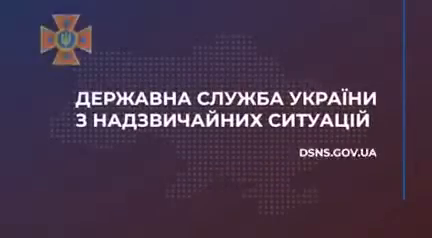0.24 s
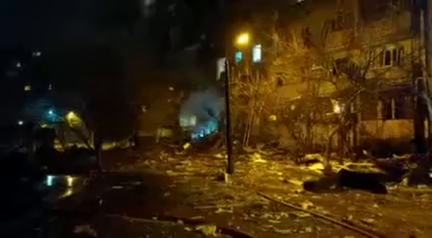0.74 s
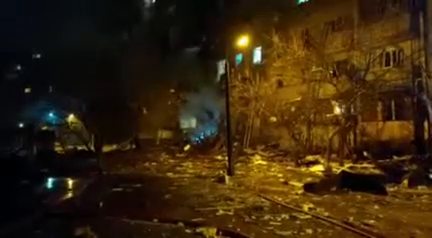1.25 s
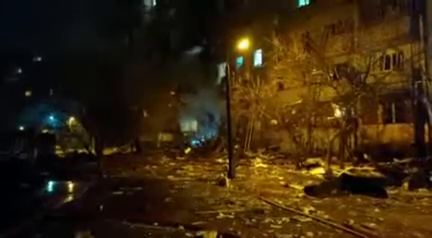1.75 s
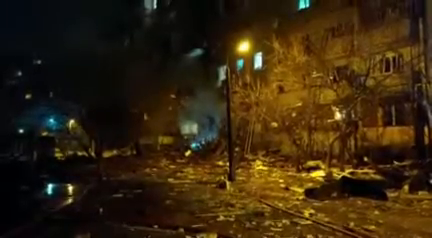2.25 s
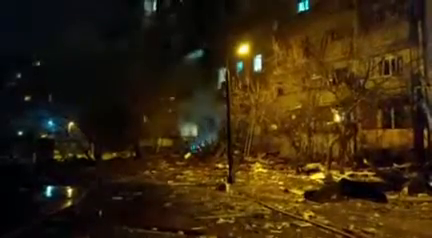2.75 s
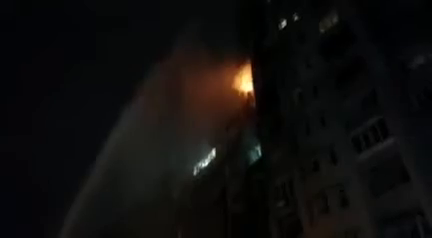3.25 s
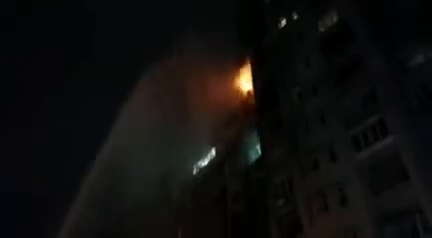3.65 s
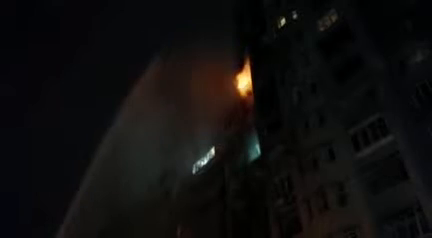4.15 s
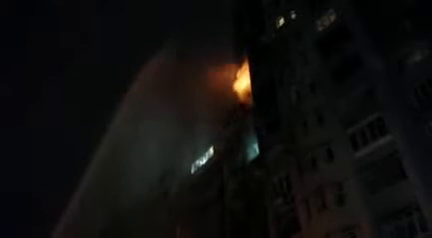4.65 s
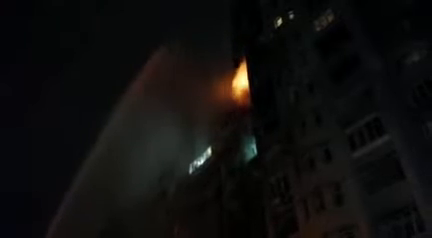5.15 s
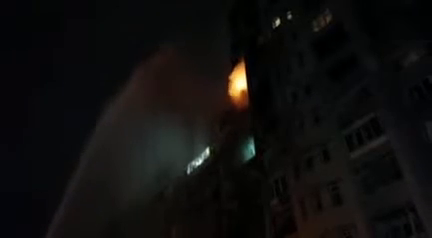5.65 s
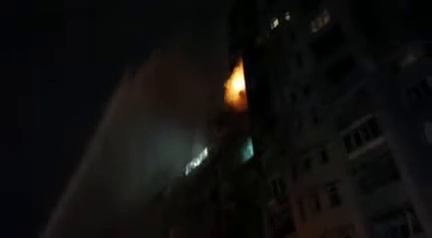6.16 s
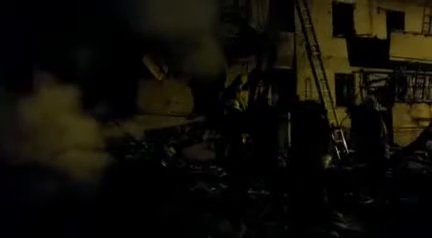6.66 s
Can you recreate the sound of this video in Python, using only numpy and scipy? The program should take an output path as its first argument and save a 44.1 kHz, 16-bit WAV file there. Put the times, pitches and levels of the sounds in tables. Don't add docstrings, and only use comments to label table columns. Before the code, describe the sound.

After half a second of silence, a fire engine's diesel drones steadily under a high whining pump; late on, revs lift slightly and a thin whistle appears.

```python
import sys
import numpy as np
from scipy import signal
from scipy.fft import irfft
from scipy.io import wavfile
from scipy.ndimage import uniform_filter1d

SR = 44100
rng = np.random.default_rng(int(sys.argv[2]) if len(sys.argv) > 2 else 0)


def wav_record(signal):
    frames = np.transpose(np.atleast_2d(signal))
    bounded = np.clip(frames, -1, 1)
    quanta = np.round(bounded * 32767).astype(np.int16)
    wavfile.write(sys.argv[1], SR, quanta)


def gain_from_db(level_db):
    decades = np.asarray(level_db, float) / 20
    return 10 ** decades


N = 305172
T = np.arange(N) / SR
LAG, START = 109409, 21992
STEADY_TURNS = 22.52

# time in seconds, tooth load in dB, wobble of the drive wheels in dB,
# wobble of the pump shaft in dB.
PUMP_DRIVE = [(2.98, 0.2, -2, 5), (3.6, -0.5, 0, 1.5), (4.1, 0.5, 0.5, -2), (4.3, 0.1, 1.5, 1),
              (4.7, 0.1, 0.5, 4), (4.9, 0.5, -12, -4), (5.1, 0.2, 9, 5), (5.55, 0.1, -1, 2),
              (5.75, -2.5, 2, 1), (5.9, -7.5, 0.5, 6), (6.05, -11, 2, 3), (6.2, -9, -1, -1),
              (6.3, -11, -12, 3), (6.48, -10.5, -13, 10.5), (6.65, -11, -19, 1), (6.92, -6.5, -7, 6.5)]
# time in seconds, crank turns a second.
ENGINE_SPEED = [(2.98, 22.509), (3.8, 22.538), (4.3, 22.506), (4.8, 22.523), (5.5, 22.502), (5.6, 22.532),
                (5.7, 22.601), (5.8, 22.676), (6.0, 22.717), (6.1, 22.718), (6.2, 22.796), (6.3, 22.926),
                (6.4, 22.984), (6.5, 23.206), (6.6, 23.325), (6.8, 23.4), (6.92, 23.378)]
# multiple of crank speed, level in dB rms, left minus right in dB,
# left lead in radians. The next three tables have the same columns.
CRANK_TONES = [(3.0, -28.5, -1.2, 0.1), (4.5, -39.6, 0.1, 0.4), (5.0, -30.9, 0.3, 0.5),
               (6.0, -29.4, 2.2, 0.0), (6.5, -47.5, -1.3, 0.0), (7.5, -39.0, -1.1, 0.0),
               (8.0, -46.7, -3.6, -0.3), (10.0, -44.1, -3.8, 0.4), (11.5, -46.3, -1.5, 0.3),
               (12.5, -41.5, 2.8, 0.2), (13.0, -34.5, 0.1, -0.1), (14.0, -36.9, -0.0, -0.1),
               (14.5, -43.5, -0.9, -0.2), (15.0, -44.2, 0.0, 0.0), (16.0, -47.3, 1.0, 0.4),
               (16.5, -43.6, -1.0, 0.6), (17.0, -44.3, 0.2, 0.2), (17.5, -48.7, 3.3, 0.3),
               (18.0, -47.4, 0.4, 0.8), (19.5, -47.2, 3.4, 0.3), (25.5, -49.5, -1.0, 0.0),
               (28.5, -44.6, 2.1, 1.0), (30.0, -50.5, 2.7, 0.4), (31.0, -50.5, -0.4, 0.4),
               (32.0, -49.2, -2.7, 0.1)]
PUMP_SHAFT_TONES = [(4.2, -29.1, -0.5, 0.3), (8.4, -40.5, -1.7, -0.3), (10.5, -46.6, -1.2, 0.1),
                    (31.5, -45.1, 0.8, -0.0), (37.8, -43.0, 2.6, 0.3), (39.9, -36.0, -9.6, 2.0),
                    (44.1, -41.2, -7.3, 0.1), (46.2, -47.1, -4.4, -2.7), (52.5, -47.9, -6.1, 1.9),
                    (67.2, -48.6, 3.6, 1.2), (71.4, -46.4, 2.2, -1.3), (75.6, -39.2, -4.1, 0.1),
                    (81.9, -48.1, -2.5, 1.0), (84.0, -32.0, -14.6, 2.3), (86.1, -45.5, -1.0, -0.1),
                    (88.2, -41.2, -1.3, 0.2), (90.3, -47.7, -5.0, 0.2), (105.0, -55.0, -4.3, -1.1),
                    (117.6, -51.6, -3.3, 1.8), (126.0, -48.2, -11.8, 1.0)]
GEAR_TONES = [(39.07, -44.9, -3.8, -2.9), (49.0, -35.3, 1.4, 0.8), (55.5, -45.9, -5.6, 2.5),
              (58.5, -49.2, -2.7, 2.8), (64.0, -48.4, -0.7, 0.3), (64.5, -48.3, -4.7, 2.0),
              (74.6, -49.0, 0.0, -0.9), (76.59, -43.9, -8.4, 1.8), (83.03, -46.5, 7.0, 2.2),
              (85.0, -41.0, -5.5, 2.3), (97.0, -49.5, -4.1, -2.8), (98.0, -40.0, -1.1, 0.0),
              (98.99, -48.7, -8.2, 0.5), (124.0, -50.5, 8.7, 0.4), (125.0, -50.9, 0.2, -2.7),
              (127.0, -47.4, 7.1, 1.0), (146.0, -57.9, 5.7, -1.8), (147.0, -47.7, 5.3, -0.0),
              (148.0, -57.8, -6.5, 0.4), (196.0, -48.8, 11.6, -0.3), (223.03, -57.9, 6.9, -1.1),
              (245.0, -57.5, -1.7, -2.5), (294.0, -60.3, 1.1, 2.7)]
FAN_TONES = [(2.39, -38.9, -1.4, 0.0), (9.56, -31.4, -1.4, 0.0), (19.12, -44.5, -0.5, 0.2),
             (130.2, -53.5, 1.6, 1.6), (148.69, -56.1, -15.8, -0.2), (167.27, -56.5, 3.6, 0.6),
             (179.67, -53.5, 1.5, 2.9), (241.62, -59.5, -1.0, -0.9), (345.17, -62.6, 0.6, 2.2)]
# teeth a crank turn, left level in dB, right level in dB, left lead in radians.
DRIVE_MESH = (42, -20.6, -19.3, -.4)
# offset in crank turns, left level in dB,
# right level in dB, left angle to the mesh in radians, right angle in radians.
WHEEL_RUNOUT = [
    (-1, -33.8, -33, .8, .1),
    (-.9794, -30.5, -29.8, 1.8, 1.1),
    (1, -39.7, -33.7, 1.3, -.3),
    (.9794, -48.5, -36.1, 2.9, 1),
]
LEADING_TONES = [
    [5, 6, 7.5, 14],
    [37.8, 39.9, 44.1, 84, 126],
    [49, 147, 196, 75.6, 98, 88.2],
    [4.2, 8.4, 9.56],
]
# time in seconds, pitch in Hz, level in dB.
WHISTLE_PATH = [
    (6.25, 4680, -52),
    (6.278, 4648, -48),
    (6.382, 4650, -45),
    (6.402, 4639, -46),
    (6.674, 4620, -37.5),
    (6.79, 4656, -57),
    (6.92, 4644, -43),
]
# frequency in Hz, density in dB per Hz.
ROAR_COLOUR = [(25, -48.5), (40, -13), (60, -7), (118, -8.5), (175, -12), (300, -12), (518, -16.5),
               (710, -17), (950, -12), (1320, -15.5), (1940, -18.5), (2600, -24), (3380, -65)]
# frequency in Hz, density in dB per Hz.
HISS_COLOUR = [(1060, -49), (1800, -7.5), (1930, -7.5), (2270, -12.5), (2390, -12.5), (2870, -9.5),
               (3120, -17), (3230, -14), (4150, -15.5), (4530, -19), (6120, -24), (7860, -24.5),
               (10400, -27.5), (13100, -27.5), (14100, -32)]
# frequency in Hz, width in Hz, level in dB.
CASING_PANELS = [(900, 200, -44), (1950, 300, -40), (291, 92, -38.5), (2960, 230, -53), (4470, 99, -46),
                 (7800, 200, -52.5), (13500, 300, -56), (3680, 150, -48), (4760, 150, -49),
                 (5570, 150, -54), (6650, 170, -56), (8350, 200, -56), (11400, 500, -55)]
THROB_ORDERS = [1, 2, 3, 4, 4.2, 7, 21]
THROB_SHARES = [.11, .08, .07, .06, .05, .03, .06]
# frequency in Hz, share in common from 0 to 1.
PORT_LIKENESS = [(60, 0.98), (130, 0.87), (280, 0.9), (610, 0.71), (1330, 0.28), (2900, 0.28), (6290, 0.01),
                 (13700, 0.02)]
# frequency in Hz, phase in radians.
PORT_LEAD = [(0, -3.5), (1890, 1.5), (3270, 1), (6630, 19.5), (7750, 31), (10400, -19), (11600, -23),
             (13900, -12.5)]
# frequency in Hz, left minus right in dB.
PORT_BALANCE = [(60, 3), (130, -3.5), (610, 1.3), (1330, -1.5), (1950, -2), (2900, -1.1), (6290, 2.0),
                (13700, -3.5)]
PART_ANSWER = {"firing": (0.059, .1, 0.4), "pipe": (0.01, -0.27, 0.9), "roar": (0.0055, 0.2, 0.1),
               "hiss": (-0.031, 0.1, 0.4), "octave": (0.069, -0.62, 0.63), "timing": (0.29, -1.7, 1),
               "second": (-0.28, -3, 0.21), "third": (0.52, 2.2, 0.8), "fourth": (.5, 1.7, 1),
               "vanes": (-0.45, -3, .5), "impeller": (0.01, -.3, 0.45), "overbeat": (0.01, 2.1, 3),
               "fan": (0.01, 0.47, 0.59), "above": (-0.5, -3.3, 1.9)}


def evened(x):
    return x / np.sqrt(np.mean(abs(x) ** 2) + 1e-20)


def read(points, hz):
    f, value = np.transpose(points)
    return np.interp(np.log(hz + 1), np.log(f + 1), value)


def columns(rows):
    seconds, *values = np.transpose(rows)
    return [np.interp(T, seconds, v) for v in values]


def level(part):
    per_load, per_speed, swell_db = PART_ANSWER[part]
    t = T[::64]
    pump, speed = np.transpose(PUMP_DRIVE), np.transpose(ENGINE_SPEED)
    load_db = np.interp(t, pump[0], pump[1])
    overspeed = 100 * (np.interp(t, *speed) / STEADY_TURNS - 1)
    swell = np.interp(t, np.arange(32) / 3.56, rng.standard_normal(32))
    db = per_load * load_db + per_speed * overspeed + swell_db * swell
    return np.interp(T, t, gain_from_db(db))


def whine(turns, above):
    teeth, left_db, right_db, lead = DRIVE_MESH
    load, wobble = gain_from_db(columns(PUMP_DRIVE)[:2])
    size = gain_from_db([[left_db], [right_db]]) * load + 0j
    for offset, left_db, right_db, *angles in WHEEL_RUNOUT:
        swell = wobble if offset < 0 else above
        turning = np.exp(1j * (2 * np.pi * offset * turns + np.c_[angles]))
        size = size + gain_from_db([[left_db], [right_db]]) * swell * turning
    mesh = np.exp(1j * (2 * np.pi * teeth * turns + np.c_[[lead, 0]]))
    return np.sqrt(2) * (size * mesh).real


def tones(table, turns, levels, waver, db, scatter=1):
    leaders = np.array(sum(LEADING_TONES, []))
    out, steps = np.zeros((2, N)), np.arange(0, N + 2048, 2048)
    heard = np.arange(START + LAG - 512, N)
    for multiple, tone_db, pan_db, lead in table:
        drift = uniform_filter1d(rng.standard_normal((len(steps), 2)).T, size=2, axis=1)
        re, im = drift * waver * multiple ** 0.18
        nearest = np.argmin(abs(np.log(leaders / multiple)))
        slow = levels[nearest][np.minimum(steps, N - 1)] * (1 + re + 1j * im)
        angle = 2 * np.pi * ((multiple * turns[heard] + scatter * rng.random()) % 1)
        angle = angle + np.interp(heard, steps, np.angle(slow))
        left, right = gain_from_db(pan_db / 2), gain_from_db(-pan_db / 2)
        size = np.interp(heard, steps, abs(slow)) * gain_from_db(tone_db + db) * 2 / np.hypot(left, right)
        out[0, heard[0]:] += size * left * np.cos(angle + lead, dtype=np.float32)
        out[1, heard[0]:] += size * right * np.cos(angle, dtype=np.float32)
    return out


def machine_tones(turns, above):
    firing, octave, vanes = level("firing"), level("octave"), level("vanes")
    shaft_wobble = gain_from_db(columns(PUMP_DRIVE)[2])
    levels = [firing, firing, firing, level("pipe")]
    levels += [octave, shaft_wobble, above, octave, octave]
    levels += [level("timing"), level("third"), level("fourth"), vanes, level("second"), octave]
    levels += [level("impeller"), level("overbeat"), level("fan")]
    engine = tones(CRANK_TONES, turns, levels, waver=0.03, db=-0.2, scatter=0.71)
    shaft = tones(PUMP_SHAFT_TONES, turns, levels, waver=0.018, db=0.44)
    gears = tones(GEAR_TONES, turns, levels, waver=0.024, db=1.2)
    fan = tones(FAN_TONES, turns, levels, waver=0.011, db=0.5)
    return engine + shaft + gears + fan


def noise(spectrum, patchy_db):
    heard = N - START - LAG + 2048
    frames, hz = heard // 256 + 5, np.fft.rfftfreq(1024, 1 / SR)
    a, b, c, d, patches = rng.standard_normal((frames, 513, 5), dtype=np.float32).T
    patches = uniform_filter1d(patches, size=10, axis=0)
    patches = evened(uniform_filter1d(patches, size=12, axis=1))
    same = np.clip(read(PORT_LIKENESS, hz), -1, 1)[:, None]
    left = a + 1j * b
    shared = same * left * np.exp(-1j * read(PORT_LEAD, hz))[:, None]
    right = shared + np.sqrt(1 - same ** 2) * (c + 1j * d)
    half_db = read(PORT_BALANCE, hz)[:, None] / 2
    ports = np.array([left * gain_from_db(half_db), right * gain_from_db(-half_db)])
    ports = ports * gain_from_db(spectrum(hz)[:, None] + patchy_db * patches)
    sound = signal.istft(ports, nperseg=1024, noverlap=768)[1][:, :heard]
    return np.pad(evened(sound), [(0, 0), (N - heard, 0)])


def throb(turns, depth):
    pulses = [share * np.cos(2 * np.pi * (order * turns + rng.random()))
              for order, share in zip(THROB_ORDERS, THROB_SHARES)]
    return 1 + depth * sum(pulses)


def panels(hz):
    return 10 * np.log10(sum(gain_from_db(2 * db) / width / (1 + (2 * (hz - centre) / width) ** 2) ** 2
                             for centre, width, db in CASING_PANELS))


def roar(turns):
    ring_db = 10 * np.log10(sum(gain_from_db(2 * db) for centre, width, db in CASING_PANELS))
    broad = gain_from_db(-26.5) * noise(lambda hz: read(ROAR_COLOUR, hz), patchy_db=-0.53)
    ringing = gain_from_db(ring_db) * noise(panels, patchy_db=1.0)
    return (broad + ringing) * level("roar") * throb(turns, depth=0.2)


def rattle(turns):
    order = np.arange(4097)
    size_db, angle = rng.standard_normal((2, 2, len(order)))
    spread_db, tilt_db = 4.5, -5
    size = gain_from_db(panels(order * STEADY_TURNS) + spread_db * size_db + tilt_db * np.log2(order + 1))
    size = size * (order > 20) * (order < 600)
    one_turn = evened(irfft(size * np.exp(2j * np.pi * angle)))
    place = np.linspace(0, 1, one_turn.shape[1], endpoint=False)
    knocks = np.array([np.interp(turns % 1, place, port, period=1) for port in one_turn])
    return gain_from_db(-38) * level("roar") * knocks


def hiss(turns):
    spray = noise(lambda hz: read(HISS_COLOUR, hz), patchy_db=-0.2)
    return gain_from_db(-33) * level("hiss") * spray * throb(turns, depth=0.32)


def whistle():
    hz, db = columns(WHISTLE_PATH)
    onset = np.clip((T - WHISTLE_PATH[0][0]) / .06, 0, 1)
    tone = np.sin(2 * np.pi * np.cumsum(hz) / SR)
    return np.sqrt(2) * onset * gain_from_db(db) * tone * gain_from_db([[1.5], [-1.5]])


def scene():
    turns = np.cumsum(columns(ENGINE_SPEED)[0]) / SR
    above = level("above")
    machine = whine(turns, above) + machine_tones(turns, above)
    machine = machine + roar(turns) + rattle(turns) + hiss(turns)
    out_from, out_db = 6.48, -5.5
    fade = gain_from_db(out_db * np.clip((T - out_from) / (T[-1] - out_from), 0, 1))
    return fade * machine + whistle()


def top_cut(x):
    return signal.sosfilt(signal.butter(12, 14270, fs=SR, output="sos"), x)


def record(dry):
    dry = signal.sosfilt(signal.butter(4, 37.0, "high", fs=SR, output="sos"), dry)
    early = np.roll(dry, -LAG, axis=1) * (np.arange(N) >= START)
    blend = np.clip((T - 2.97) / (3.97 - 2.97), 0, 1)
    return top_cut((1 - blend) * early + blend * dry)


dry = scene()
out = record(dry)
wav_record(out)
```